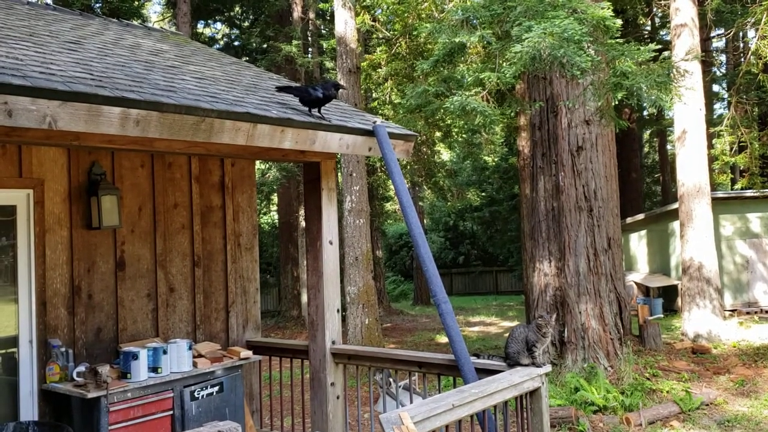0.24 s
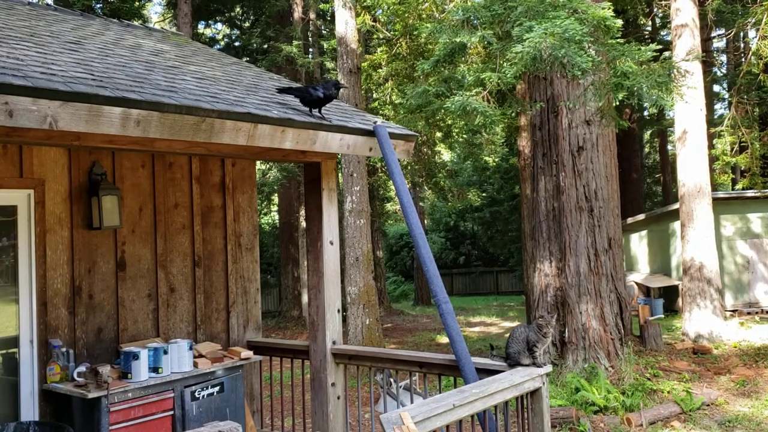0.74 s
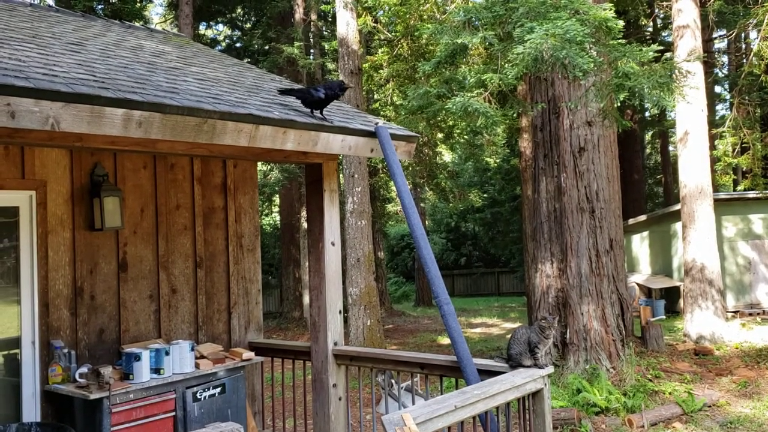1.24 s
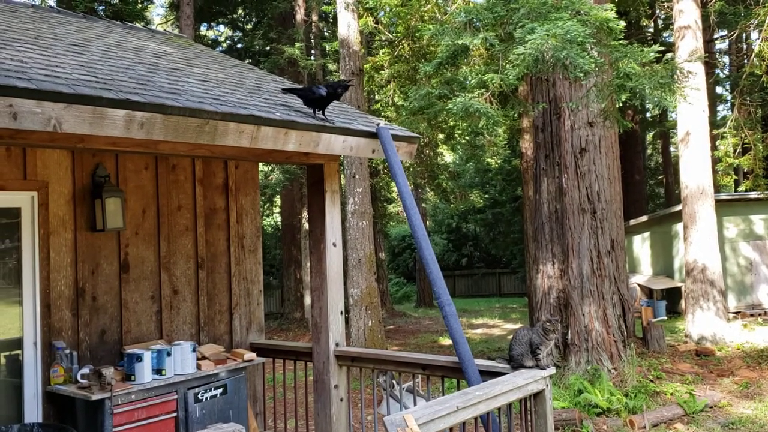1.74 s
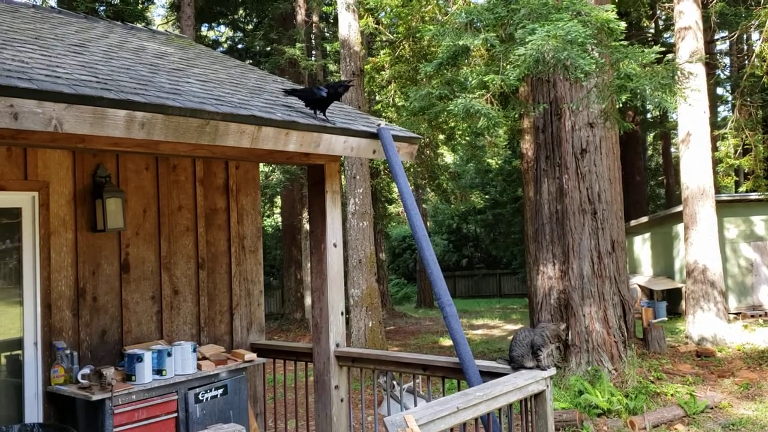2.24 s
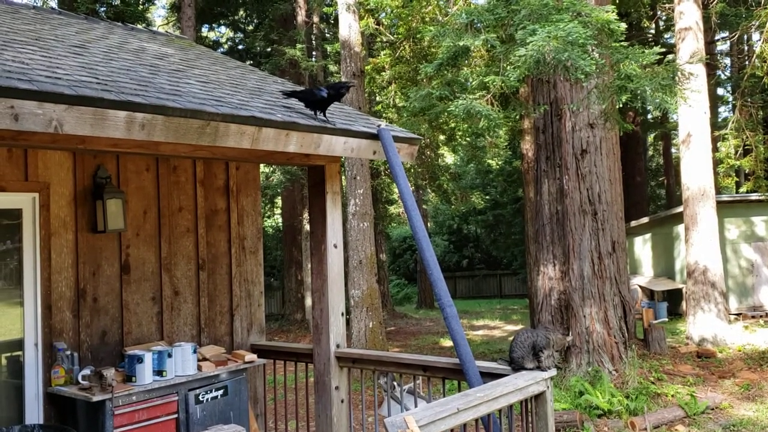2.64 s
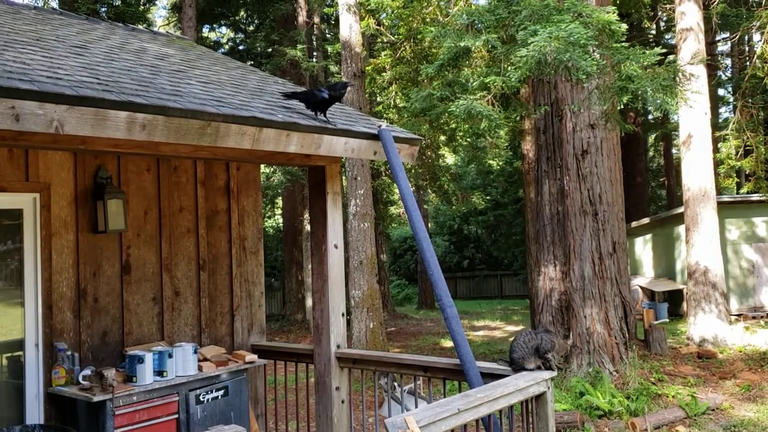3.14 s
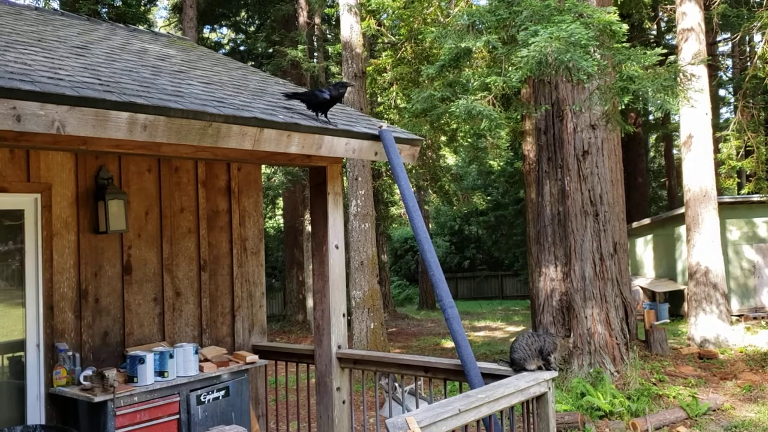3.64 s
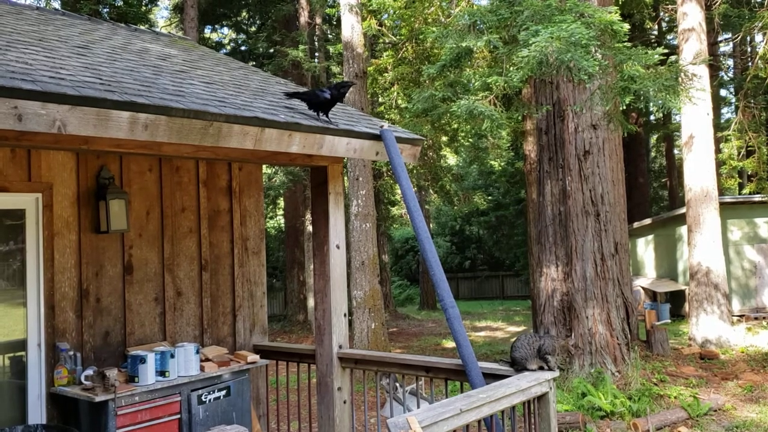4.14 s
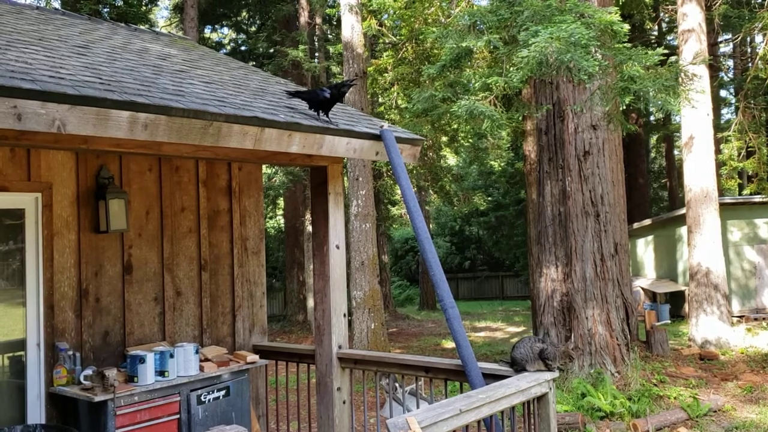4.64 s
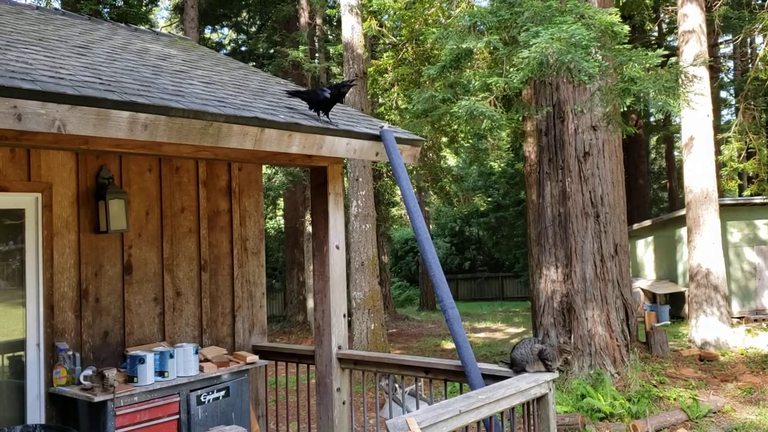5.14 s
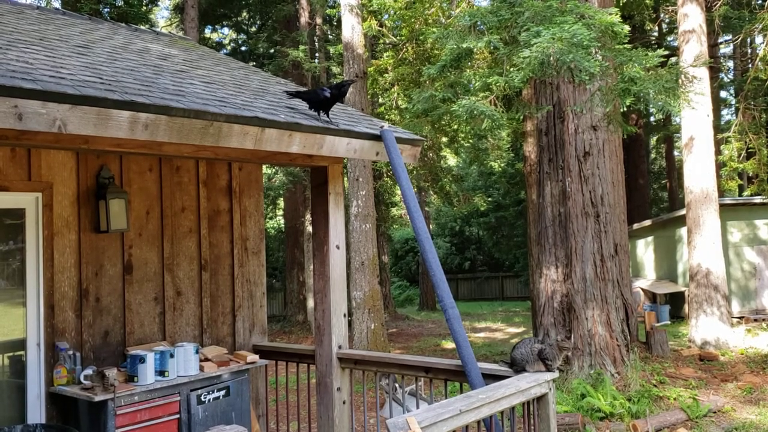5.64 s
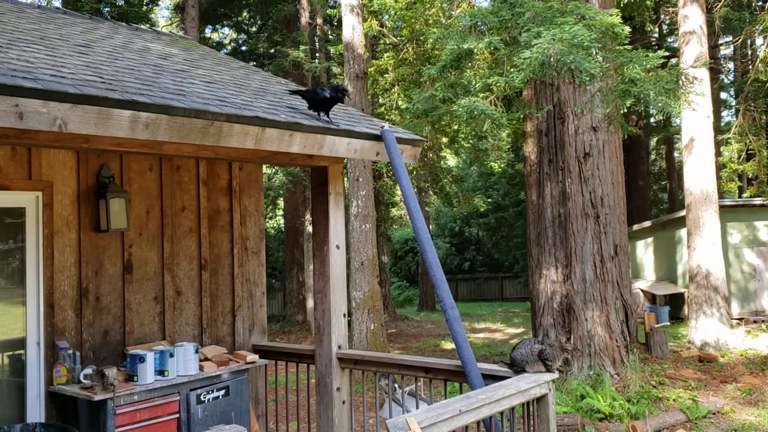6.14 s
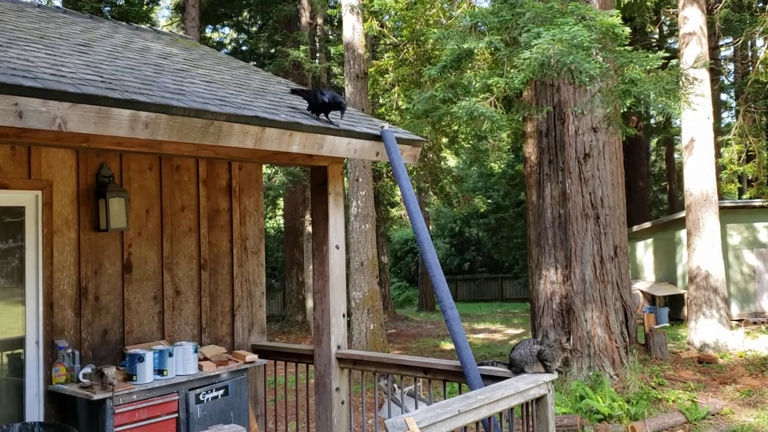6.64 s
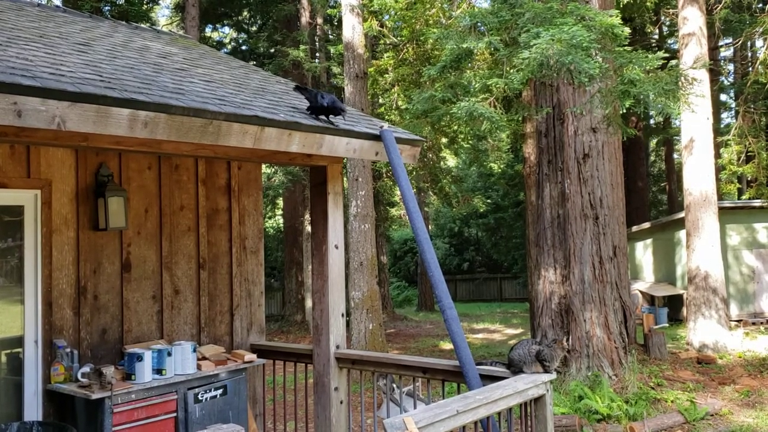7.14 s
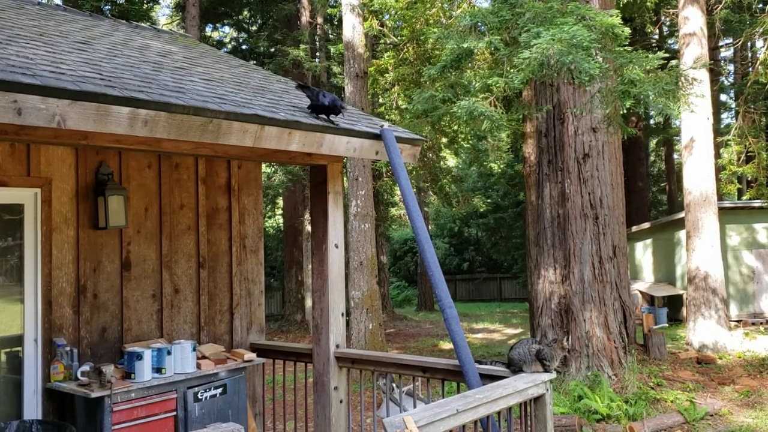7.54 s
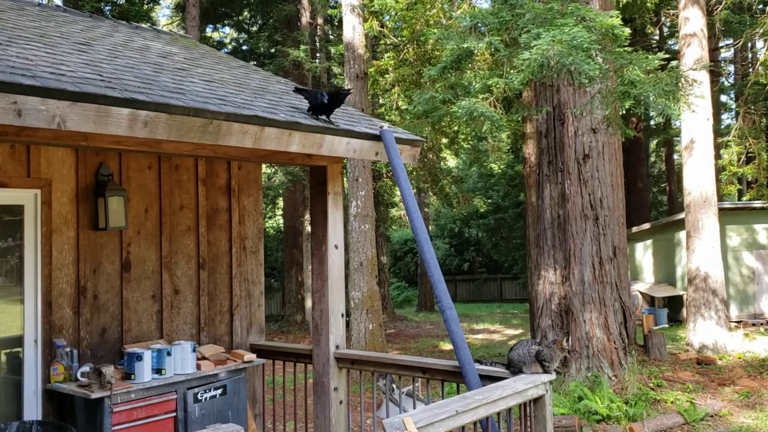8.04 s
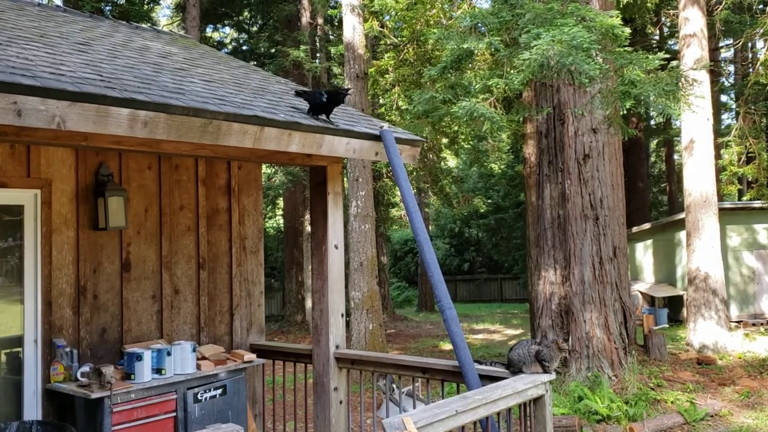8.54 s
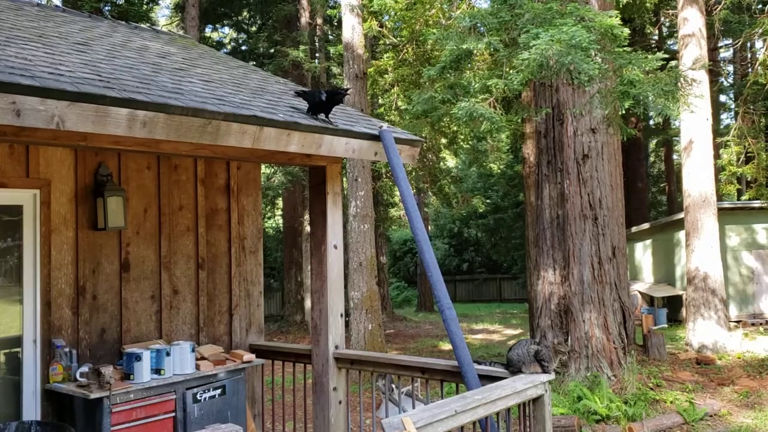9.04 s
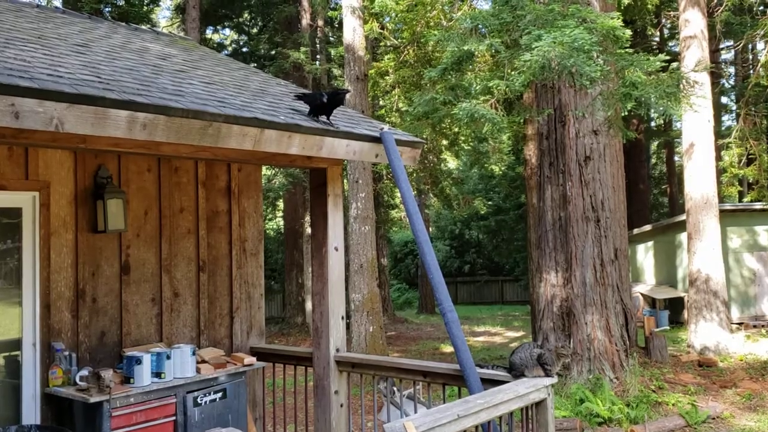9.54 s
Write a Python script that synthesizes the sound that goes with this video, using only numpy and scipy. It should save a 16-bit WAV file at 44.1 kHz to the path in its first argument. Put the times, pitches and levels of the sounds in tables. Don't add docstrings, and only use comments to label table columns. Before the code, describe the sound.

A raven on a cabin roof a few metres away gives three low, hoarse, rattling croaks, pauses, repeats the three, pauses longer, then gives three more. Short echoes return from wall and trunks. Behind it lie a quiet forest hush, low wind puffs and tiny distant whistles. In the second pause a faint songbird sings while hands knock, brush and sharply tick near the left side of the hand-held microphone.

```python
import sys
import numpy as np
from scipy import signal
from scipy.fft import rfft, irfft
from scipy.io import wavfile
from scipy.ndimage import uniform_filter1d

SR = 44100
rng = np.random.default_rng(int(sys.argv[2]) if len(sys.argv) > 2 else 0)


def invert_db(level):
    return 10 ** (np.asarray(level, dtype=float) / 20)


def unload_audio(sound):
    columns = np.transpose(np.atleast_2d(sound))
    steps = np.round(np.clip(columns, -1, 1) * 32767)
    wavfile.write(sys.argv[1], SR, steps.astype(np.int16))


N = 431298

# f/Hz, density/dB
AIR_COLOUR = [(12, -54), (20, -33.5), (86, 12.5), (130, -17.5), (198, -8), (434, -10.5), (499, -14.5),
              (1060, -21.5), (1400, -25.5), (1810, -31), (2320, -19.5), (3340, -35.5), (4540, -32),
              (5680, -40), (16000, -37.5)]
AIR_DB = -70.5
# f/Hz, level/dB
AIR_SIDE = [(60, -8), (110, -3), (200, 1.5), (380, 2), (700, 8), (1290, 3.5), (2380, 20.5), (4400, 5.5),
            (8120, 2.5), (15000, -2)]
# f/Hz, coherence/1
AIR_COHERENCE = [(60, 0.79), (180, 1), (550, 0.49), (1650, -0.86), (4970, -0.18), (15000, 0.57)]
# f/Hz, density/dB
WIND_COLOUR = [(12, -45.5), (20, -19.5), (42, -32.5), (65, 4), (248, -11), (308, -8.5), (392, -19.5),
               (500, -14.5), (650, -51), (1100, -120)]
# peak t/s, level/dB, dying time/s
GUSTS = [(.24, -76, 0.059), (.92, -63.5, 0.088), (1.6, -64.5, 0.33), (2.21, -67, 0.074),
         (2.45, -67.5, 0.18), (3.97, -61, 0.056), (4.39, -57, 0.1), (4.85, -52.5, 0.1), (5.45, -63.5, .1),
         (5.97, -67, 0.035), (6.211, -55.5, .1), (6.67, -55, 0.029), (7.22, -64.5, .06), (8.25, -68.5, .2),
         (8.881, -61, 0.13), (9.24, -54, .1), (9.45, -63, .9)]
CALM_DB, GUST_RISE = -72.5, 0.42

# t/s, level/dB, start f/Hz, end f/Hz, length/s
WHISTLES = [(0.302, -77, 4800, 4420, 0.064), (0.345, -71, 4340, 4600, 0.087), (.49, -79, 6250, 6550, 0.037),
            (0.596, -86, 4760, 5300, .12), (1.27, -74.5, 8100, 8100, 0.081), (1.3, -75, 6400, 6320, 0.036),
            (1.428, -78, 8100, 8200, 0.08), (2.77, -74, 4480, 4600, .1), (2.916, -78, 6220, 6580, 0.029),
            (7.292, -75.5, 1350, 1256, 0.124), (7.753, -92, 4180, 4700, .16),
            (7.917, -80.5, 6500, 6940, .1), (8.038, -80, 6400, 6460, 0.068)]
# t/s, level/dB, knee f/Hz, length/s
SONG = [
    (6.276, -82, 6130, 0.22),
    (6.443, -75, 6280, 0.11),
    (6.617, -71.5, 6070, 0.085),
    (6.801, -70, 5970, 0.096),
    (6.992, -67.5, 5800, 0.083),
    (7.167, -71, 6170, 0.083),
    (7.346, -70.5, 6100, 0.051),
]
SONG_TOP_HZ, SONG_END_HZ = 7500, 3950

# t/s, peak level/dB, ring f/Hz, left minus right level/dB
KNOCKS = [(0.919, -56.5, 213, 15), (3.58, -70, 181, 6), (6.151, -63, 150.4, 16), (6.245, -61.5, 175, 21),
          (6.329, -63.5, 160, 25.5), (6.398, -59, 289, 10), (6.615, -67, 457, 17), (7.179, -79, 231, 1),
          (9.381, -75, 288, -36), (9.497, -63, 161, 11.5), (9.597, -56.5, 154, 6)]
# t/s, length/s, level/dB
RUSTLES = [
    (0.89, 0.01, -79),
    (3.577, .012, -72),
    (6.363, 0.082, -66),
    (6.692, .08, -69.5),
    (7.063, 0.083, -92),
    (9.59, 0.018, -71),
]
# t/s, body level/dB, snap level/dB, snap width/ms
TICKS = [
    (6.6658, -60, -38, .06),
    (6.66795, -21, -26, .08),
    (6.6764, -50, -17, .12),
    (6.67672, -10.5, -6.5, .055),
]

# first slap t/s, late slap t/s, first gap/ms, last gap/ms, slap number at the half-way gap
RATTLE = [
    (1.5763, 1.752, 13.6, 21.0, 2.3),
    (1.9599, 2.155, 13.4, 21.3, 2.8),
    (2.3766, 2.576, 14.0, 22.9, 3.7),
    (4.3567, 4.534, 14.2, 21.7, 2.9),
    (4.7515, 4.969, 14.4, 22.6, 4.3),
    (5.2025, 5.417, 14.4, 22.1, 4.2),
    (8.1485, 8.318, 13.0, 21.5, 3.3),
    (8.5642, 8.768, 14.8, 22.8, 3.5),
    (8.987, 9.205, 14.4, 22.4, 4.0),
]
# full effort level/dB, first slap re full/dB, top flap f/Hz, sizzle level/dB (beak towards camera)
VOICE = [
    (-21.5, -11, 480, -42.5),
    (-23, -9, 470, -43),
    (-23, -13.5, 462, -45),
    (-22.5, -15, 462, -48.5),
    (-23, -20.5, 460, -43.5),
    (-23, -18, 461, -42.5),
    (-20.5, -26.5, 465, -36),
    (-22.5, -7.5, 461, -38.5),
    (-23.5, -28, 467, -40.5),
]
OPEN_S, FULL_SHARE, SPENT_S = .035, .55, 0.027
OPEN_DB, LATE_DB, SPENT_DB = -3.5, -1.5, -18
SECOND_S, SECOND_DB = 0.0057, -9
SHARP_DB = [-18, -11, -13, -14, -10.5]
SAG = [.91, .95, 1.02, 1.02, .94]
TONE_DB = [-41, -24.5, -25, -24.5, -35]
LEAD_IN_DB, LEAD_IN_S = -28, .014

# f/Hz, width/Hz, level/dB
CHEST = [(617, 42, -32), (829.6, 130, -20), (984.6, 110, -1.5), (1075.7, 296, -6.5), (1060, 51, 2.5),
         (1166.5, 56, 1.5), (1350, 160, -18), (1625.5, 210, -12)]
# f/Hz, width/Hz, level/dB
SLACK = [(1098, 304, 0.5), (1763, 210, -6.5)]
# f/Hz, width/Hz, level/dB
BEAK = [(2675, 550, 1), (3600, 640, -1.5), (4177, 860, -7), (4780, 800, -2.5), (6220, 1200, -16),
        (7400, 200, -15)]
# f/Hz, width/Hz, level/dB
EDGE = [(9100, 1900, -3), (11700, 1500, 1), (14900, 1000, 1)]
FILL_S, EMPTY_SHARE = 0.11, 0.23
SLACK_DB, SLACK_KEPT = 22.5, 0.22
BREATH_HIGH, FLAPS_HIGH = 0.46, 0.073

# t/ms, level/dB
NEAR_LEFT = [(5.5, -2.5), (7.2, -8), (10, -0.5), (14, -5), (19, 0.5)]
# t/ms, level/dB
NEAR_RIGHT = [(3, -5.5), (6.5, -2), (9, -10.5), (12.5, -16.5), (17, -6.5)]
# f/Hz, level/dB
RAVEN_SIDE = [(60, 1), (92, 4.5), (140, 4), (210, 0.5), (330, 0.5), (500, 5), (770, 2), (1170, 1),
              (1790, -5.5), (2740, 10.5), (4190, 4.5), (6410, -1), (9810, -3), (15000, -4)]
# f/Hz, t60/s
YARD = [(300, 0.52), (1000, 0.15), (2000, 0.22), (5000, 0.18), (9000, 0.029)]
# f/Hz, t60/s
FOREST = [(300, 1.0), (1000, 1.3), (2000, .9), (5000, .7), (7000, .65), (9000, .4)]
TONE_YARD = .12


def evened(x):
    return x / np.sqrt(np.mean(x ** 2) + 1e-20)


def read(points, hz):
    f, value = np.transpose(points)
    return np.interp(np.log(hz + 1), np.log(f + 1), value)


def add(mix, s, sound):
    part = mix[..., round(s * SR):][..., :sound.shape[-1]]
    part += sound[..., :part.shape[-1]]


def high_pass(x, order, hz):
    return signal.sosfilt(signal.butter(order, hz, "high", fs=SR, output="sos"), x)


def lean(x, side):
    half_db = read(side, np.fft.rfftfreq(N, 1 / SR)) / 2
    return irfft(rfft(x) * invert_db(np.array([half_db, -half_db])), N)


def hiss(colour, coherence, patchy_db):
    hz = np.fft.rfftfreq(2048, 1 / SR)
    a, b, c, d, patches = rng.standard_normal((N // 512 + 5, 1025, 5)).T
    patches = uniform_filter1d(patches, size=14, axis=0)
    patches = evened(uniform_filter1d(patches, size=8, axis=1))
    same = np.clip(coherence(hz), -1, 1)[:, None]
    left = a + 1j * b
    right = same * left + np.sqrt(1 - same ** 2) * (c + 1j * d)
    gain = invert_db(read(colour, hz)[:, None] + patchy_db * patches)
    return signal.istft(np.array([left, right]) * gain, nperseg=2048, noverlap=1536)[1][:, :N]


def air():
    hush = lean(hiss(AIR_COLOUR, lambda hz: read(AIR_COHERENCE, hz), patchy_db=1.2), AIR_SIDE)
    hush = high_pass(hush, 4, 150)
    t = np.arange(N) / SR
    gusts = invert_db(CALM_DB)
    for s, db, dying in GUSTS:
        gusts = gusts + invert_db(db) * np.exp(np.minimum((t - s) / GUST_RISE, s - t) / dying)
    wind = evened(hiss(WIND_COLOUR, lambda hz: 0.42 + 0 * hz, patchy_db=2.4))
    return invert_db(AIR_DB) * hush / np.std(hush.mean(0)) + gusts * high_pass(wind, 2, 40)


def tail(x, decays, start_s):
    taps = np.zeros((2, SR))
    at = np.arange(0, SR - 20, 20) + rng.integers(0, 20, (2, SR // 20 - 1))
    np.put_along_axis(taps, at, rng.choice([-1., 1.], at.shape), 1)
    hz, t, z = signal.stft(taps, SR, nperseg=256)
    h = signal.istft(z * invert_db(-60 * t / read(decays, hz)[:, None]), SR, nperseg=256)[1]
    h *= np.clip(np.arange(h.shape[1]) / SR / start_s, 0, 1) ** 2
    return signal.fftconvolve(x[None], h / np.linalg.norm(h[0]), axes=1)[:, :N]


def far_birds():
    dry = np.zeros(N)
    for s, db, knee_hz, length in SONG:
        u = np.linspace(0, 1, round(length * SR))
        hz = np.interp(u, [0, .15, .38, 1], [SONG_TOP_HZ, .96 * knee_hz, knee_hz, SONG_END_HZ])
        hz *= 1 + .027 * evened(uniform_filter1d(rng.standard_normal(len(hz)), size=60))
        level = invert_db(db + np.interp(u, [0, .1, .35, 1], [-2, 7, 5.0, -10.0]))
        add(dry, s, level * np.sin(2 * np.pi * np.cumsum(hz) / SR))
    for s, db, from_hz, to_hz, length in WHISTLES:
        hz = np.linspace(from_hz, to_hz, round(length * SR))
        hz *= 1 + .012 * evened(uniform_filter1d(rng.standard_normal(len(hz)), size=200))
        add(dry, s, invert_db(db) * np.hanning(len(hz)) * np.sin(2 * np.pi * np.cumsum(hz) / SR))
    scatter = tail(dry, [(1000, .4), (8000, 0.41)], .004)
    return (0.43 * dry + scatter) * invert_db([[-1.5], [1.5]])


def ring(x, modes):
    out = np.zeros(len(x))
    for k, (hz, width, db) in enumerate(modes):
        pole = np.exp((2j * np.pi * hz - np.pi * width) / SR)
        once = signal.lfilter([1 - abs(pole)], [1, -pole], x + 0j)
        twice = signal.lfilter([1 - abs(pole)], [1, -pole], once)
        out += (-1) ** k * invert_db(db) * twice.real
    return out


def knocks(out):
    t = np.arange(2600) / SR
    for s, db, hz, pan_db in KNOCKS:
        puff = rng.standard_normal(len(t)) * np.exp(-t / .01)
        knock = evened(ring(puff, [(hz, 350, 0), (900, 600, -22)]))
        add(out, s, invert_db(db - 8) * knock * invert_db([[pan_db / 2], [-pan_db / 2]]))


def rustles(out):
    for s, length, db in RUSTLES:
        noise = rng.standard_normal((2, round(length * SR)))
        brush = np.array([ring(v, [(1060, 320, 13), (4200, 2500, 1)]) for v in noise])
        add(out, s, invert_db(db) * evened(brush) * np.hanning(brush.shape[1]))


def ticks(out):
    t = np.arange(2600) / SR
    after = np.maximum(t - .00035, 0)
    for s, body_db, snap_db, width_ms in TICKS:
        body = invert_db(body_db) * np.sin(2 * np.pi * 560 * after) * np.exp(-after / .0009)
        thump = invert_db(body_db - 38) * np.sin(2 * np.pi * 230 * t) * np.exp(-t / 0.015)
        snap = -invert_db(snap_db) * np.exp(-((t - .0003) / width_ms * 1e3) ** 2)
        snap *= 1 + .06 * np.cos(2 * np.pi * 12500 * (t - .0003))
        add(out, s - .0003, (body + thump + snap) * invert_db([[0], [-36]]))


def handling():
    out = np.zeros((2, N))
    knocks(out)
    rustles(out)
    ticks(out)
    return high_pass(out, 1, 90)


def croak(rattle, full_db, first_db, top_hz, facing_db):
    peak, late, first_ms, last_ms, half = rattle
    start = peak - .001
    t = np.arange(start - .002, late + .03, 1 / SR)
    stages = [start, start + OPEN_S, start + FULL_SHARE * (late - start), late, late + SPENT_S]
    effort_stages = np.insert(stages, 1, start + SECOND_S)
    effort_db = full_db + np.interp(t, effort_stages, [first_db, SECOND_DB, OPEN_DB, 0, LATE_DB, SPENT_DB])
    sharp_db = np.interp(t, stages, SHARP_DB)
    tone_db = full_db + np.interp(t, stages, TONE_DB)
    hz = top_hz * np.interp(t, stages, SAG)

    slap = np.arange(16)
    gaps = (first_ms + (last_ms - first_ms) / (1 + np.exp((half - slap) / .8))) / 1e3
    beat = np.interp(t, start + np.cumsum(gaps) - gaps, slap, left=0)
    flap = np.cumsum(hz) / SR - hz[0] * .002

    pulses = np.diff(np.floor(flap), prepend=-1) * invert_db(1.2 * rng.standard_normal(len(t)))
    off = abs(beat - np.round(beat)) * np.interp(beat, slap, gaps) * hz
    slaps = evened(pulses * np.sqrt(np.clip(.5 + 2.5 * (.5 - off), 0, 1)))
    flaps = evened(pulses)
    breath = rng.standard_normal(len(t)) * (.35 + 1.8 * np.exp(-(beat % 1) / .22))

    onset = np.clip((t - start) / .07, 0, 1) ** 2
    fade = np.clip((t[-1] - t) / 0.014, 0, 1)
    pad = np.zeros(1500)
    sharp = invert_db(effort_db + sharp_db) * fade
    low = np.r_[invert_db(effort_db) * fade * (slaps + .12 * flaps + .2 * breath), pad]
    high = np.r_[sharp * (slaps + FLAPS_HIGH * flaps + BREATH_HIGH * breath), pad]
    sizzle = np.r_[sharp * onset * (.3 * slaps + breath), pad]

    opening = np.r_[np.clip((t - start) / .06, .1, 1), pad]
    colour = invert_db(3 * rng.standard_normal((len(BEAK), len(high))))
    beak = np.zeros(len(high))
    for k, mode in enumerate(BEAK):
        beak += (-1) ** k * ring(high * colour[k] * opening ** (k / 4), [mode])
    beak = invert_db(12.0) * beak + invert_db(facing_db + 26) * ring(sizzle, EDGE)

    side = np.array([np.sin(2 * np.pi * (flap - 2 * beat + turn)) for turn in (.2, .5)])
    others = sum(np.sin(2 * np.pi * (flap + k * beat)) for k in (-3, -1, 1, 2, 4))
    tone = invert_db(tone_db + 6) * fade * (np.sin(2 * np.pi * flap) + 1.05 * onset * side + 0.16 * others)

    fill = np.r_[np.clip((t - start) / FILL_S, 0, 1), pad]
    slack = invert_db(SLACK_DB) * ring(low * (1 - (1 - SLACK_KEPT) * fill), SLACK)
    chest = invert_db(22.5) * ring(low * (EMPTY_SHARE + (1 - EMPTY_SHARE) * fill), CHEST)
    return t[0], chest, slack, beak, tone


def raven():
    chest, slack, beak = np.zeros((3, N))
    tones, near = np.zeros((2, N)), np.zeros((2, 1500))
    for rattle, voice in zip(RATTLE, VOICE):
        s, *parts = croak(rattle, *voice)
        lead_in = (parts[0] + parts[1])[:500] * np.hanning(1000)[500:]
        add(chest, s - LEAD_IN_S, invert_db(LEAD_IN_DB) * lead_in)
        for mix, part in zip((chest, slack, beak, tones), parts):
            add(mix, s, part)
    for side, echoes in zip(near, (NEAR_LEFT, NEAR_RIGHT)):
        for ms, db in echoes:
            side[round(ms * SR / 1e3)] = invert_db(db)
    direct = np.array([chest + slack + beak, np.roll(chest + slack, 6) + np.roll(beak, 1)])
    beak = beak + slack / 2
    echoes = signal.oaconvolve((chest + .35 * beak)[None], near, axes=1)[:, :N]
    yard = tail(chest + 1.3 * beak + TONE_YARD * tones.mean(0), YARD, 0.011)
    forest = tail(chest + 2.9 * beak + .2 * tones.mean(0), FOREST, 0.17)
    wet = invert_db(-5) * (yard + .8 * yard[::-1])
    wet += invert_db(-35.5) * (forest + 0.34 * forest[::-1])
    wet[1] = np.roll(wet[1], 6)
    return high_pass(lean(direct + echoes + tones + wet, RAVEN_SIDE), 3, 170)


def scene():
    return raven() + far_birds() + handling() + air()


def band_limit(x):
    return signal.sosfilt(signal.butter(12, 16740, fs=SR, output="sos"), x)


def record(dry):
    edge = signal.firwin(301, 16400, window=("kaiser", 8), fs=SR)
    mix = signal.oaconvolve(dry, edge[None], "same", axes=1)
    return band_limit(mix)


dry = scene()
out = record(dry)
unload_audio(out)
```